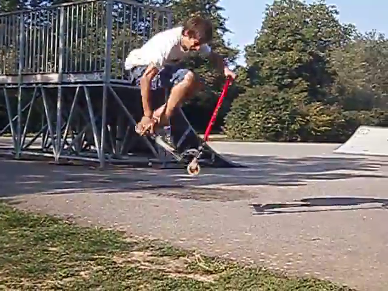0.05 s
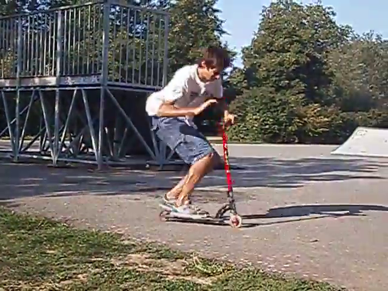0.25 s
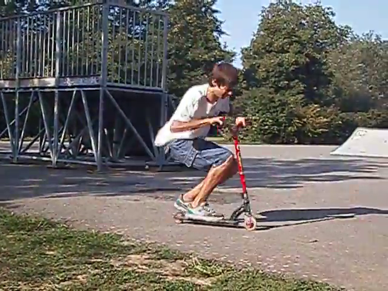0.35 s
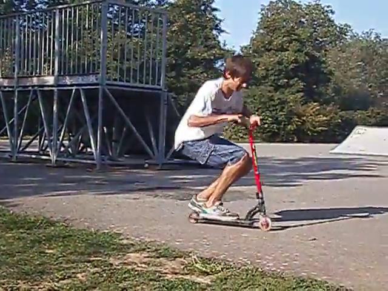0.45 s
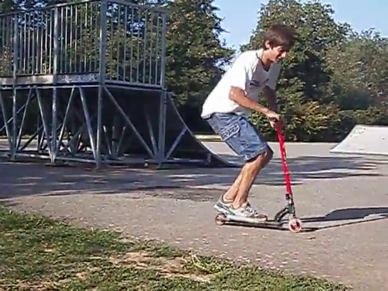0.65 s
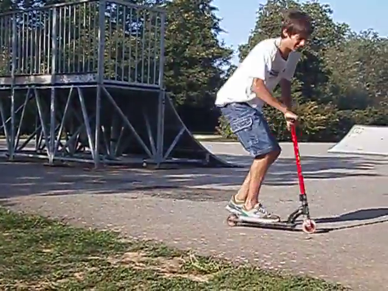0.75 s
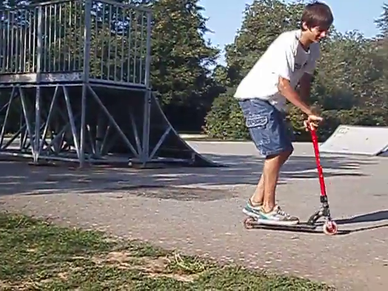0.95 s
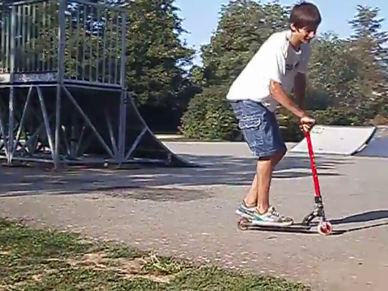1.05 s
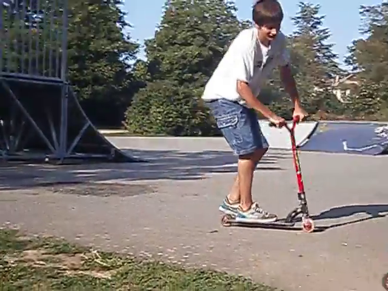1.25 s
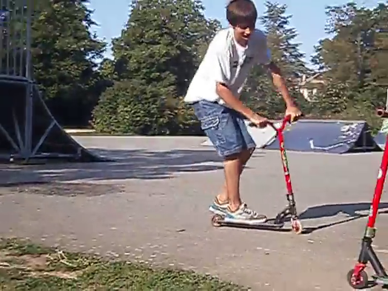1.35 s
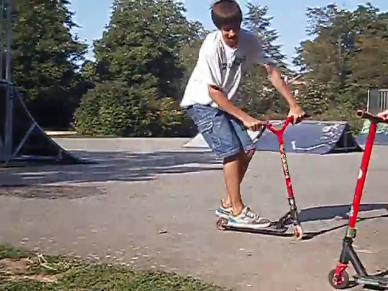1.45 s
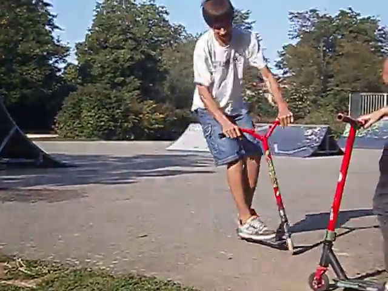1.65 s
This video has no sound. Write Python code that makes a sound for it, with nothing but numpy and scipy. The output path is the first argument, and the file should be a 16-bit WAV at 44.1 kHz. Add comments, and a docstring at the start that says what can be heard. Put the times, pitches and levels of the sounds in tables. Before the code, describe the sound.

A stunt scooter lands on asphalt at about 0.2 seconds, a loud, slightly distorted slam with a quick metal rattle and faint outdoor reflections. The wheels judder with a low falling whirr until 0.5 seconds. Soft gritty rolling fades, then grows closer from 1.1 seconds, with small pebble taps and a light scrape around 1.5 to 1.6 seconds. Light wind and hiss continue throughout, with little treble.

```python
"""A stunt scooter drops off a ramp onto asphalt: a quick cluster of impacts excites the damped modes of
its deck, fork and bars, and the frame rattles. The wheels judder in stick-slip under the rider's weight,
then roll closer over grit, with small taps and a scrape. Ramps and trees return faint reflections, and
light wind blows. A small camera with a narrow band and a steady hiss overloads briefly on the slam."""
import sys
import numpy as np
from scipy import signal
from scipy.fft import rfft, irfft
from scipy.io import wavfile
from scipy.ndimage import uniform_filter1d

SR = 44100
rng = np.random.default_rng(int(sys.argv[2]) if len(sys.argv) > 2 else 0)


def waveform_to_disk(signal):
    """Save audio, clipped to [-1, 1], as 16-bit WAV at the path in sys.argv[1]."""
    frames = np.transpose(np.atleast_2d(signal))
    scaled = np.clip(frames, -1, 1) * 32767
    samples = np.round(scaled).astype(np.int16)
    wavfile.write(sys.argv[1], SR, samples)


N = 74970

# Landing and rattle: start_s, thump_db, clank_db, knock_db, ring_db, crunch_re_modes_db
IMPACTS = [(.21891, -11.5, -29, -24, -35, 10), (.22437, -30, -12.5, -16, -13, 7.5),
           (.22857, -15.5, -10, -15.5, -14.5, 13.5), (.23353, -9.5, -36, 2, -10.5, -10),
           (.23607, 0, -7.5, -13.5, -19.5, 2), (.2457, -38, -10.5, -18, -19, 9),
           (.25725, -15.5, -17.5, -14, -20.5, 3), (.25963, -22, -6.5, -25, -51, -10),
           (.26502, -40, -22, -28.5, -32, 14), (.28, -18.5, -10.5, -15.5, -23.5, 5),
           (.3155, -39, -50, -25.5, -38, 4)]
# Normal modes of deck, fork and bars: frequency_hz, level_db, t60_s
FRAME_MODES = [(56, -22, 0.053), (279.3, -25.5, 0.25), (311.6, -6.5, .071), (409, -21.5, 0.099),
               (719, -17.5, 0.1), (771, -16, 0.12), (1031, -10.5, 0.018), (1283, -12, 0.0099),
               (1546, -12, 0.024), (2210, -33, .025), (2652, -14.5, 0.097), (2868, 9, 0.016),
               (3120, -16, 0.024), (3330, -11.5, 0.12), (3718, -11, 0.13)]
# Breakpoints of an impact's force spectrum (thump, clank twice, knock twice, ring): frequency_hz
REGISTER_HZ = [430, 700, 780, 1000, 2250, 2600]
# Spectrum of crunching asphalt: frequency_hz, gain_db
CRUNCH_SPECTRUM = [(30, -18), (60, -15), (110, -22), (260, -1.5), (550, -14.5), (1000, -3), (1800, -9),
                   (2400, -9.5), (3000, -2), (3600, -2), (4200, -12)]
# Envelope of the wheel and fork vibration: time_s, level_db
JUDDER_ENVELOPE = [(.335, -66), (.362, -42), (.378, -40), (.425, -42.5), (.445, -55), (0.531, -66)]
# Envelope of the slipping wheels' low whirr: time_s, level_db
WHIRR_ENVELOPE = [(.34, -55), (.368, -38.5), (.40, -38.5), (.44, -42), (.465, -43.5), (.49, -65)]
# Harmonics of the slip rate: harmonic_number, relative_db
WHIRR_HARMONICS = [(2, 0), (3, -1)]
# Envelope of the rolling noise as the scooter comes closer: time_s, level_db
ROLL_ENVELOPE = [(.22, -46), (.3, -39.5), (.5, -37.5), (.7, -46.5), (1.08, -51), (1.28, -42.5),
                 (1.5, -36.5), (1.56, -40), (1.7, -39)]
# Spectrum of the rolling noise: frequency_hz, gain_db
ROLL_SPECTRUM = [(40, -14), (100, -12), (160, -1.5), (290, 1), (520, -11), (980, 0.5), (1400, -16),
                 (2400, -8.5), (2900, -12.5), (4200, -9)]
# Envelope of the wheels' scrape in the turn: time_s, level_db
SCRAPE_ENVELOPE = [(1.1, -66), (1.38, -66), (1.44, -57), (1.49, -42.5), (1.54, -58), (1.61, -44.5),
                   (1.7, -68)]
# Spectrum of the scrape and of the pebble clicks: frequency_hz, gain_db
SCRAPE_SPECTRUM = [(400, -13), (1500, -11), (2400, -6), (2900, 9.5), (3500, 0), (4200, -7)]
# Wheels striking pebbles and cracks: start_s, level_db, pitch_hz, click_db
PEBBLE_TAPS = [(1.184, -34.5, 918, -33.5), (1.261, -32.5, 944, -46), (1.297, -35, 1036, -53),
               (1.401, -29.5, 1010, -35), (1.43, -46, 1010, -38), (1.467, -46, 1010, -36),
               (1.477, -37, 887, -32.5), (1.497, -36.5, 830, -39), (1.634, -35, 730, -54)]
# Spectrum of the reflections from ramps and trees: frequency_hz, gain_db
REFLECTION_SPECTRUM = [(100, 1), (300, -17), (1000, -11), (2200, 7), (2850, -3), (3400, 2.5), (4000, 3)]
# Spectrum of light wind and microphone hiss: frequency_hz, gain_db
WIND_HISS_SPECTRUM = [(15, -20), (60, 4.5), (95, -1.5), (170, 0.5), (300, -2), (520, -8), (1150, -5),
                      (1700, -12.5), (2500, -13), (3400, -7.5), (4100, -9)]


def frame_impacts(contact_s=0.0008, crunch_rise_s=0.00067, crunch_t60_s=0.035):
    """Modal superposition: each impact's force spectrum weights the frame's modes and a noisy crunch."""
    out, t = np.zeros(N), np.arange(SR // 3) / SR
    for start_s, thump_db, clank_db, knock_db, ring_db, crunch_db in IMPACTS:
        force_db = [thump_db, clank_db, clank_db, knock_db, knock_db, ring_db]
        ring = np.zeros(len(t))
        for hz, mode_db, t60_s in FRAME_MODES:
            onset_db = mode_db + np.interp(hz, REGISTER_HZ, force_db)
            ring += amp(onset_db - 60 * t / t60_s) * np.sin(2 * np.pi * hz * t)
        crunch = unit(colour(rng.standard_normal(len(t)), CRUNCH_SPECTRUM))
        crunch = colour(crunch, list(zip(REGISTER_HZ, force_db)))
        crunch *= amp(crunch_db - 60 * t / crunch_t60_s) * (1 - np.exp(-t / crunch_rise_s))
        add(out, start_s, ring * (1 - np.exp(-t / contact_s)) + crunch)
    return out


def wheel_judder(slip_hz=110, reference_s=.374, slowing_per_s=3.5, jitter=.04):
    """Stick-slip: uneven slips, slowing as the load eases, shake wheel and fork and make a falling whirr."""
    t = np.arange(N) / SR
    start_s, end_s = JUDDER_ENVELOPE[0][0], JUDDER_ENVELOPE[-1][0]
    speed = np.exp(-slowing_per_s * (np.clip(t, start_s, end_s) - reference_s))
    cycles = np.cumsum(slip_hz * speed * (1 + jitter * wander(size=200))) / SR
    slips = np.exp(-(cycles % 1) / .3) * rng.standard_normal(N)  # one noise burst per slip
    wheel = unit(resonate(slips, hz=270 * speed, width_hz=320))
    fork = amp(15) * unit(resonate(slips, hz=960, width_hz=420))
    whirr = sum(amp(db) * np.sin(2 * np.pi * k * cycles) for k, db in WHIRR_HARMONICS)
    sound = unit(wheel + fork) * level(JUDDER_ENVELOPE) + unit(whirr) * level(WHIRR_ENVELOPE)
    return sound * (t > start_s) * (t < end_s)


def rolling_wheels():
    """Roughness excitation: after touchdown the hard wheels rumble over grit and scrape in the turn."""
    rumble = unit(colour(grit(), ROLL_SPECTRUM)) * level(ROLL_ENVELOPE)
    scrape = unit(colour(grit(), SCRAPE_SPECTRUM)) * level(SCRAPE_ENVELOPE)
    touchdown_s = ROLL_ENVELOPE[0][0]
    return (rumble + scrape) * (np.arange(N) / SR > touchdown_s)


def grit(grains_per_s=1100, spread_db=4):
    """Shot noise: asphalt grains under the wheels give impulses of random time, sign and size."""
    size = amp(spread_db * np.minimum(rng.exponential(1, N), 3))
    return rng.choice([-1., 1.], N) * size * (rng.random(N) < grains_per_s / SR)


def pebble_taps(knock_rise_s=0.0021, click_rise_s=0.0019):
    """Impact transients: each pebble or crack gives a heavily damped knock and a gritty click."""
    out, t = np.zeros(N), np.arange(SR // 20) / SR
    knock_pulse, click_pulse = (t / rise * np.exp(1 - t / rise) for rise in (knock_rise_s, click_rise_s))
    for start_s, level_db, pitch_hz, click_db in PEBBLE_TAPS:
        knock = amp(level_db) * knock_pulse * np.sin(2 * np.pi * pitch_hz * t)
        click = amp(click_db) * click_pulse * unit(colour(rng.standard_normal(len(t)), SCRAPE_SPECTRUM))
        add(out, start_s, knock + click)
    return out


def park_reflections(x, level_db=-16, t60_s=0.42, delay_s=0.023):
    """Diffuse scattering: ramps and trees return a delayed, exponentially decaying tail."""
    t = np.arange(SR) / SR
    tail = colour(rng.standard_normal(SR), REFLECTION_SPECTRUM) * amp(-60 * t / t60_s) * (t > delay_s)
    return amp(level_db) * signal.fftconvolve(x, tail / np.linalg.norm(tail))[:N]


def wind_and_hiss(level_db=-35, flutter_db=0.8):
    """Broadband noise: light wind and microphone hiss form a floor whose level flutters slightly."""
    noise = unit(colour(rng.standard_normal(N), WIND_HISS_SPECTRUM))
    return noise * amp(level_db + flutter_db * wander(size=1200))


def amp(db):
    """Amplitude ratio of a level in decibels."""
    return 10 ** (np.asarray(db) / 20)


def unit(x):
    """Normalisation to rms 1."""
    return x / np.sqrt(np.mean(x ** 2) + 1e-20)


def level(points):
    """Amplitude envelope through points of time_s, level_db."""
    return amp(np.interp(np.arange(N) / SR, *np.transpose(points)))


def colour(x, points):
    """Spectral shaping by points of frequency_hz, gain_db."""
    hz, db = np.transpose(points)
    log_hz = np.log(np.fft.rfftfreq(len(x), 1 / SR) + 1)
    return irfft(rfft(x) * amp(np.interp(log_hz, np.log(hz), db)), len(x))


def wander(size):
    """Low-pass noise of rms 1, smoothed over size samples."""
    return unit(uniform_filter1d(uniform_filter1d(rng.standard_normal(N), size), size))


def add(mix, start_s, sound):
    """Superposition of a sound on the mix from start_s."""
    part = mix[max(round(start_s * SR), 0):][:len(sound)]
    part += sound[:len(part)]


def resonate(x, hz, width_hz):
    """Resonance by heterodyning: a two-pole low-pass is shifted to follow the centre frequency hz."""
    carrier = np.exp(2j * np.pi * np.cumsum(hz * np.ones(N)) / SR)
    pole = np.exp(-np.pi * width_hz / SR)
    baseband = signal.lfilter([(1 - pole) ** 2], [1, -2 * pole, pole * pole], x / carrier + 1e-18)
    return (carrier * baseband).real


def scene():
    """Linear superposition of the scooter, its reflections and the noise floor, in mono."""
    scooter = frame_impacts() + wheel_judder() + rolling_wheels() + pebble_taps()
    return (scooter + park_reflections(scooter) + wind_and_hiss())[None]


def record(dry):
    """Band limiting and saturation: the camera cuts the treble, flattens peaks and filters again."""
    band_hz, edge_hz, ceiling = 4138, 15800, 0.76
    band_filter = signal.firwin(241, band_hz, window=("kaiser", 8), fs=SR)
    edge_filter = signal.firwin(511, edge_hz, window=("kaiser", 9), fs=SR)
    narrow = signal.oaconvolve(dry, band_filter[None], "same")
    saturated = np.clip(narrow, -ceiling, ceiling)
    return signal.oaconvolve(saturated, edge_filter[None], "same")


dry = scene()
out = record(dry)
waveform_to_disk(out)
```